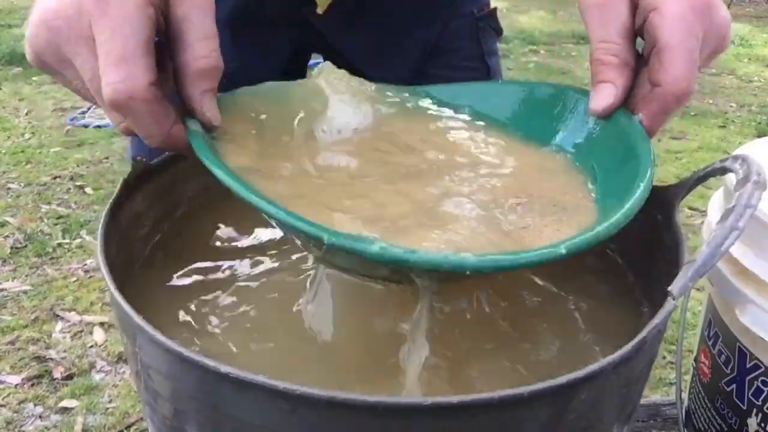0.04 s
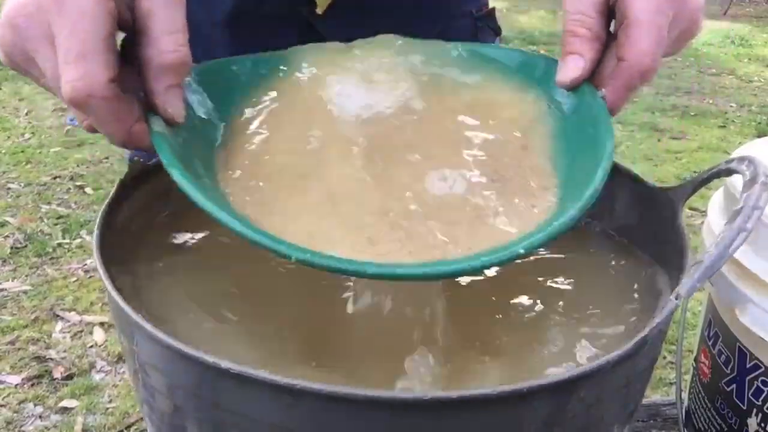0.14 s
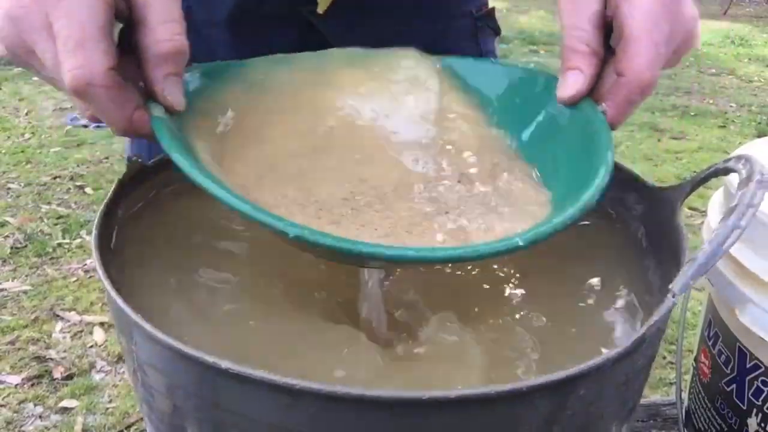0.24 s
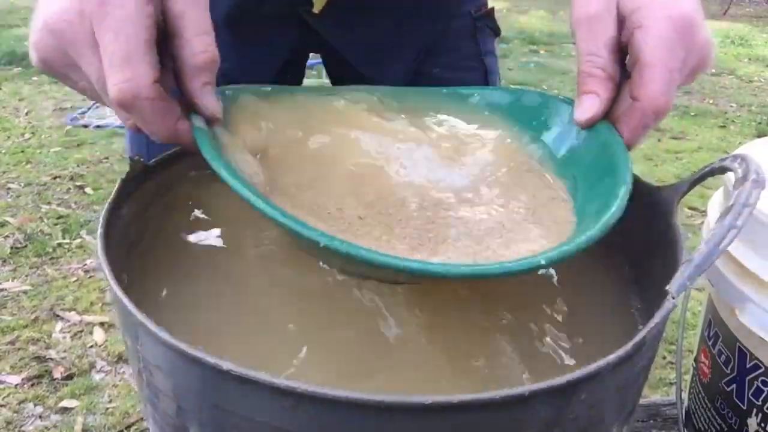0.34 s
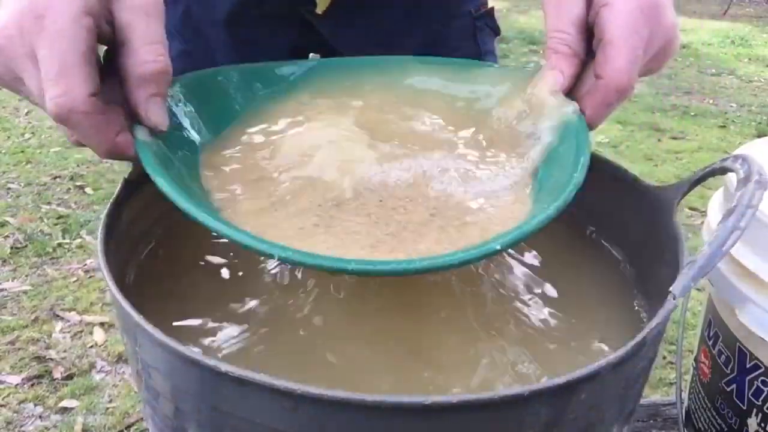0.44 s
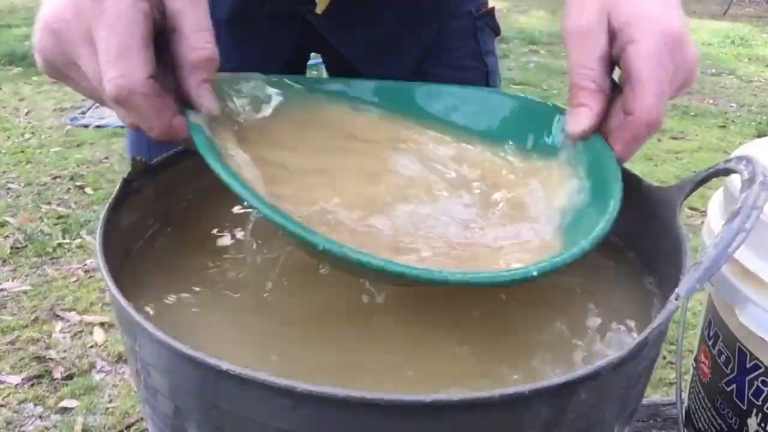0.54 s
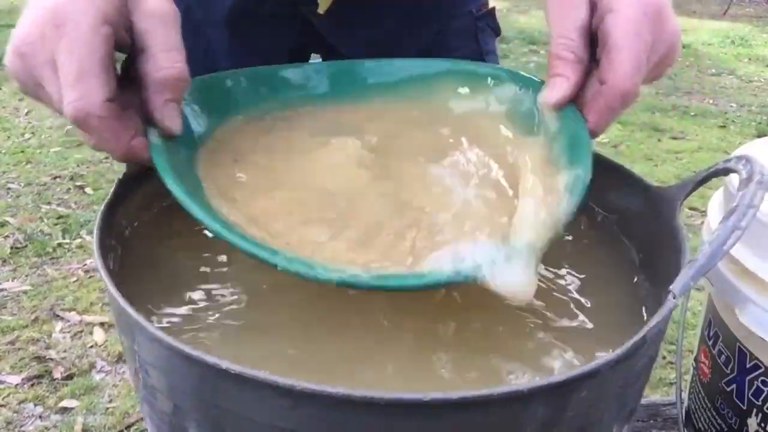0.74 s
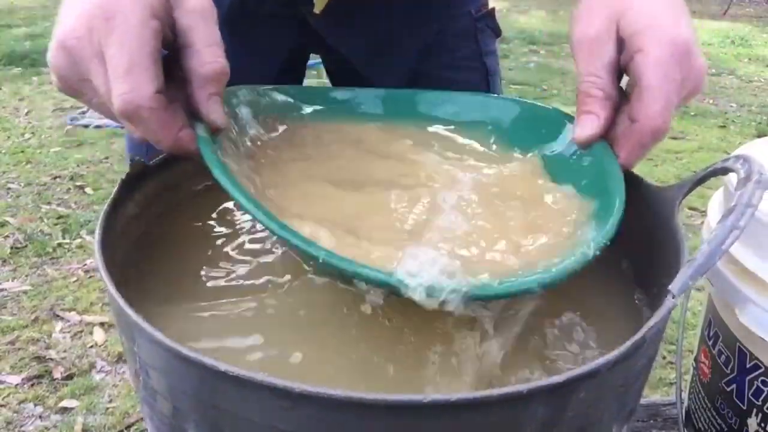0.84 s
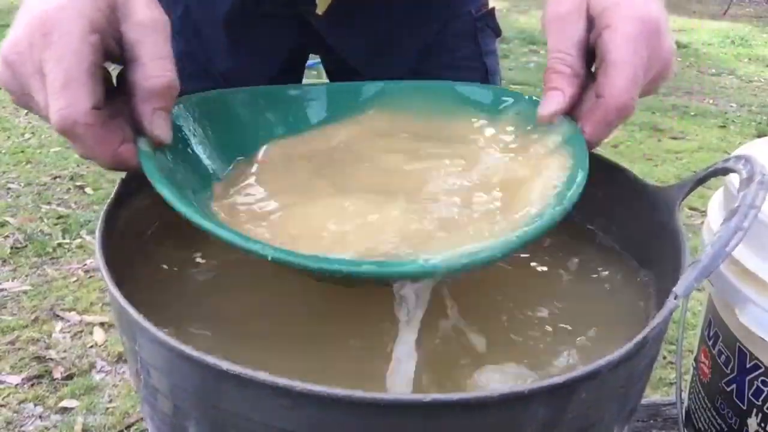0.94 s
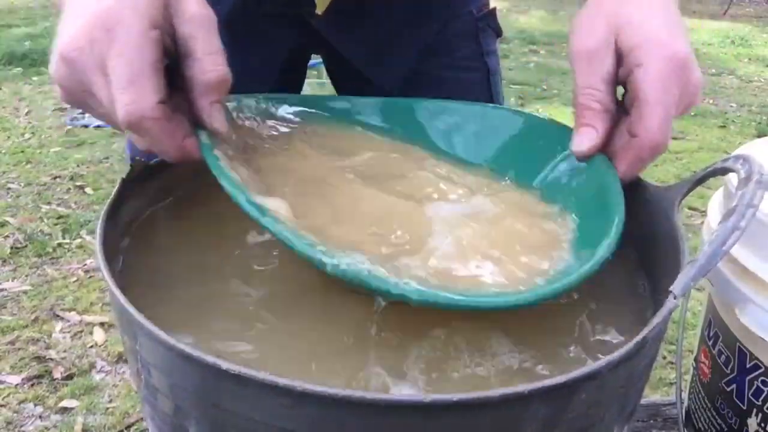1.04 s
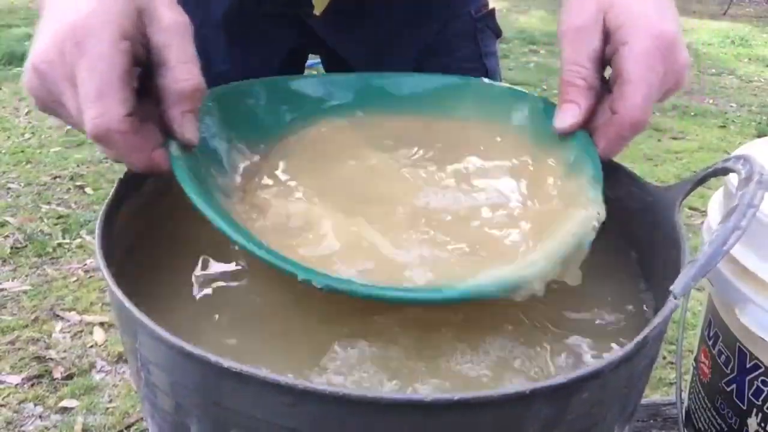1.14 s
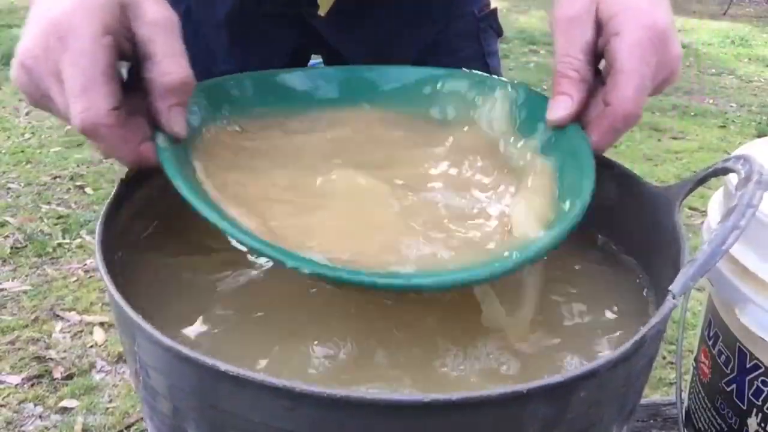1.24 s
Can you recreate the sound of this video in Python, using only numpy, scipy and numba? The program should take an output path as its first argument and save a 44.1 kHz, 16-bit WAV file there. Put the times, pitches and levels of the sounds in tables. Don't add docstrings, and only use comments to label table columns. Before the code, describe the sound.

Water spills off a swirled plastic pan into a full tub, plopping and splashing outdoors

```python
import sys
import numpy as np
from scipy import signal
from scipy.fft import rfft, irfft
from scipy.io import wavfile
from scipy.ndimage import uniform_filter1d
from numba import njit

SR = 44100
rng = np.random.default_rng(int(sys.argv[2]) if len(sys.argv) > 2 else 0)


def rack_gain(trim_db):
    fader = np.asarray(trim_db, float)
    return 10 ** (fader / 20)


def put_to_file(sound):
    columns = np.atleast_2d(sound).T
    safe = np.clip(columns, -1, 1)
    whole_steps = np.round(safe * 32767)
    wavfile.write(sys.argv[1], SR, whole_steps.astype(np.int16))


N = 57330

PLOP_GLIDE, PLINK_GLIDE, SWARM_GLIDE = 0.0003, 0.0015, 0.004
PLOP_WOBBLE, PLINK_WOBBLE = 0.12, 0.32
DROP_RISE_S, TINY_RISE_S, BURST_RISE_S = 0.0011, 0.0008, 0.0007


@njit
def ring(n, start, hz, fall, rise, glide, size):
    out = np.zeros(n)
    for k in range(len(start)):
        phase = 0.0
        step = 2 * np.pi * hz[k] / SR
        for i in range(max(start[k], 0), n):
            age = i - start[k]
            decay = np.exp(-age / fall[k])
            swell = 1 - np.exp(-(age / rise) ** 2)
            out[i] += size[k] * decay * swell * np.sin(phase)
            phase += step
            step = min(step * glide[k], 2.6)
            if decay < 2e-3:
                break
    return out


@njit
def svf(x, hz, width_hz):
    y, b, l = np.empty(len(x)), 0.0, 0.0
    g, k = np.tan(np.pi * hz / SR), width_hz / hz
    for i in range(len(x)):
        v = (b + g * (x[i] - l)) / (1 + g * (g + k))
        b, l, y[i] = 2 * v - b, l + 2 * g * v, k * v
    return y


def unit(x):
    return x / np.sqrt(np.mean(x ** 2))


def unit_band(x, hz, width_hz):
    return unit(svf(svf(x, float(hz), float(width_hz)), float(hz), float(width_hz)))


def bubbles(s, db, hz, cycles, rise_s, glide):
    fall = np.clip(cycles, 2, 26) / hz * SR / np.log(10) + rise_s * SR
    start = ((s - rise_s / 2) * SR).astype(np.int64)
    return ring(N, start, hz, fall, rise_s * SR, (1 + glide) ** (hz / SR), rack_gain(db))


def wobble(depth):
    lowpass = signal.butter(4, 300, fs=SR, output="sos")
    return 1 + depth * unit(signal.sosfilt(lowpass, rng.standard_normal(N)))


# [t/s, level/dB peak, f/Hz, cycles to -20 dB]
PLOPS = [(0.026, -31, 1824, 12.5), (0.097, -35.5, 1450, 17), (0.166, -27, 1293, 10),
         (0.1955, -35, 1714, 23.5), (0.21, -38, 1168, 13), (0.233, -27.5, 1275, 6.5),
         (0.264, -37, 1630, 19), (0.2729, -23.5, 1408, 7.5), (0.312, -44.5, 607, 14),
         (0.349, -30.5, 2036, 22), (0.369, -24, 2003, 23), (0.396, -42.5, 1250, 17),
         (0.4063, -31, 1190, 19), (0.4401, -13.5, 1270, 5), (0.11, -39.5, 1680, 16),
         (.119, -38.5, 2230, 12), (0.45, -30.5, 1550, 32), (0.4709, -20, 1430, -4), (0.48, -23, 1545, 5),
         (0.838, -27, 1570, 4.5), (0.852, -27, 1570, 0), (0.871, -30.5, 1405, 5), (0.8915, -26, 930, 1.5),
         (0.9252, -27.5, 1700, 3.5), (0.904, -36.5, 1170, 4), (0.937, -44.5, 923, 17),
         (1.102, -23, 1416, -2), (1.096, -36, 1580, 4)]
# [t/s, level/dB peak, f/Hz, cycles to -20 dB]
TWINS = [
    (0.0243, -26, 1286, 5),
    (.349, -33.5, 1373, 23),
    (.372, -23.5, 1397, 10),
    (.580, -35, 2094, 10),
    (1.102, -32.5, 990, 4.5),
    (.1885, -32.5, 2550, 9),
    (1.2717, -42, 2950, 8),
]


def plops():
    table = np.vstack([PLOPS, TWINS]).T
    return bubbles(*table, DROP_RISE_S, PLOP_GLIDE) * wobble(PLOP_WOBBLE)


# [t/s, level/dB peak, f/Hz, cycles to -20 dB]
PLINKS = [(0.0267, -37, 3890, 28), (0.0593, -23.5, 3350, 12), (.4578, -15, 2400, 11), (0.31, -36, 5780, 14),
          (0.1352, -31, 3500, 17), (0.138, -32, 4100, 17), (0.1522, -26.5, 3720, 23),
          (0.1658, -25.5, 2930, 6.5), (0.239, -39.5, 3770, 29), (0.2745, -29, 3350, 13),
          (0.2968, -27, 3850, 13), (0.3477, -23.5, 4415, 26), (0.3675, -21, 2830, 15),
          (0.401, -33, 2830, 25), (0.414, -30.5, 4020, 18), (0.4386, -21, 2540, 7),
          (0.4468, -21.5, 4440, -4), (0.4467, -30.5, 5100, 21)]
LATE_PLINKS = [(0.5098, -30.5, 5650, 9.1), (0.5144, -39, 4130, 11), (0.5809, -32.5, 3120, 13),
               (0.6278, -36.5, 4540, 11), (0.837, -27, 2260, 9.5), (0.8525, -31, 3320, 8),
               (.8535, -32, 4100, 8.9), (.8375, -32.5, 4260, 6), (.841, -33, 5430, 15),
               (.9195, -34.5, 6200, 6.3), (.87, -36, 6030, 16), (.904, -34, 5230, 10),
               (.979, -40.5, 4700, 8.8), (.967, -38, 3400, 7.4), (0.8791, -31.5, 2090, 12),
               (0.9, -30.5, 2500, 13), (0.9116, -34, 4060, 7.6), (0.975, -41.5, 3280, 12),
               (1.047, -34, 5280, 17), (1.048, -41, 6040, 10), (1.115, -38.5, 2720, 10),
               (1.29, -46, 2360, 14)]


def plinks():
    table = np.vstack([PLINKS, LATE_PLINKS]).T
    return bubbles(*table, DROP_RISE_S, PLINK_GLIDE) * wobble(PLINK_WOBBLE)


# [t/s, level/dB peak, f/Hz, cycles to -20 dB]
SWELLS = [
    (0.4600, -3, 2740, 2),
    (0.483, -19, 1216, 24),
    (0.078, -27, 3640, 8),
    (0.1226, -25, 4650, 14),
    (0.4250, -24, 1070, 4),
    (1.1105, -35, 3610, 22),
    (0.622, -38, 3850, 6),
    (0.5065, -34, 4450, 8),
]


def swells():
    return bubbles(*np.array(SWELLS, float).T, 0.0021, PLOP_GLIDE) * wobble(PLOP_WOBBLE)


def froth(count):
    parents = np.vstack([PLOPS, TWINS, PLINKS, LATE_PLINKS]).T
    s, db, hz = parents[:3]
    delay, detune, drop = rng.random((len(s), count, 3)).T
    onset = s + 0.0094 * delay ** 2
    pitch = np.clip(hz * np.exp(0.295 * 2 * (2 * detune - 1)), 700, 9000)
    level = np.minimum(db - 9, -29) - 16.4 * drop
    return bubbles(onset.ravel(), level.ravel(), pitch.ravel(), 3, TINY_RISE_S, SWARM_GLIDE)


# [t/s, level/dB peak, f/Hz, cycles to -20 dB]
SLOSH = [
    (.416, -36, 729, 14),
    (.424, -38.5, 828, 6),
    (0.525, -38.5, 512, 5.5),
    (0.527, -38, 224, -1.5),
    (0.534, -47.5, 344, 11.5),
    (0.546, -44, 191.5, 8),
    (.554, -47.5, 210.5, 8.5),
    (.93, -52, 452, 5),
]


def slosh():
    return bubbles(*np.array(SLOSH, float).T, 0.00049, 0.0) * wobble(PLOP_WOBBLE)


def puff(n, ring_s):
    t = np.arange(n) / SR
    return (1 - np.exp(-(t / BURST_RISE_S) ** 2)) * np.exp(-2 * t / ring_s)


# [t/s, level/dB peak, f/Hz centre]
SPLATS = [(0.118, -42.5, 9550), (0.134, -34.5, 8900), (0.156, -43, 15000), (0.2396, -36, 7950),
          (0.2588, -38, 7400), (0.2779, -18, 6100), (0.2783, -29, 9400), (0.323, -39.5, 6700),
          (0.3467, -27.5, 10700), (0.3536, -26, 7600), (0.3696, -15.5, 8700), (0.3716, -18, 8800),
          (0.375, -28.5, 7000), (0.387, -31, 9400), (0.402, -31.5, 8200), (0.4471, -25, 6860),
          (0.47, -27, 8100), (0.4784, -33, 8700), (0.5074, -31.5, 8620), (0.525, -34, 12500),
          (0.53, -35.5, 8500), (0.5514, -35, 12500), (0.5824, -37, 12700), (0.8355, -33.5, 10920),
          (0.856, -22.5, 11650), (0.9657, -48.5, 9600), (1.0914, -39, 14900), (1.121, -45.5, 9700),
          (1.1762, -50, 14000), (1.1864, -41.5, 13900), (1.195, -46, 14300), (1.282, -45, 13000),
          (1.2213, -46, 12400), (.922, -42, 12400), (1.2725, -48, 9600)]


def splats():
    length = 1024
    out, envelope = np.zeros(N + length), puff(length, ring_s=0.0028)
    for s, db, hz in SPLATS:
        noise = rng.standard_normal(length)
        bright = unit_band(noise, hz, 0.67 * hz)
        body = unit_band(noise, 0.5 * hz, 0.52 * hz)
        body_db = -5 if hz > 6000 else 5
        i = int((s - BURST_RISE_S / 2) * SR)
        out[i:i + length] += rack_gain(db) * envelope * (bright + rack_gain(body_db) * body)
    return out[:N]


# [t/s, level/dB peak, f/Hz centre, ring/s]
SLAPS = [(0.0242, -41, 2470, 0.0092), (0.0593, -38, 3080, 0.016), (0.138, -38, 3770, 0.014),
         (.151, -38.5, 4260, 0.011), (0.159, -42, 4730, 0.0096), (0.1971, -37.5, 2960, .006),
         (0.2308, -38.5, 3500, 0.0061), (0.273, -30, 2470, 0.0055), (.415, -37, 2220, 0.01),
         (0.427, -31, 2030, 0.012), (.455, -26, 2300, 0.0073), (0.4717, -35, 2000, 0.0043),
         (.478, -33.5, 2800, 0.0079), (.515, -37.5, 3500, 0.0039), (0.5251, -27.5, 4500, 0.0023),
         (0.531, -34, 3020, 0.0037), (.540, -35, 3500, 0.0037), (0.553, -39.5, 2830, .007),
         (0.565, -41, 3800, 0.0055), (.580, -39, 3150, 0.013), (0.6269, -46, 4450, 0.005),
         (0.836, -34.5, 3600, 0.0072), (0.848, -43, 3600, 0.0093), (0.8514, -27, 3620, 0.0056),
         (0.87, -37, 3040, 0.0071), (.879, -39, 2940, 0.013), (0.89, -39.5, 3000, 0.014),
         (0.901, -44, 3200, 0.012), (0.9239, -36, 3070, 0.0081), (0.9747, -48.5, 3750, 0.009),
         (1.048, -46.5, 5100, 0.0045), (1.1016, -36.5, 2600, 0.0094), (1.114, -41, 2670, 0.0054),
         (1.273, -47, 2200, 0.0042)]


def slaps():
    length = 2048
    out = np.zeros(N + length)
    for s, db, hz, ring_s in SLAPS:
        burst = unit_band(rng.standard_normal(length), hz, 0.95 * hz)
        i = int((s - BURST_RISE_S / 2) * SR)
        out[i:i + length] += rack_gain(db) * puff(length, ring_s) * burst
    return out[:N]


# [f/Hz, level/dB]
SWARM = [(600, -12), (1200, 8), (2500, 6), (4500, 2), (7000, -4)]


def fizz(count):
    sizes = np.array(SWARM, float).T
    when, pitch, loudness, length = rng.random((count, 4)).T
    hz = sizes[0, 0] * (sizes[0, -1] / sizes[0, 0]) ** pitch
    db = np.interp(np.log(hz), np.log(sizes[0]), sizes[1]) + 10 * loudness ** 2
    cycles, glide = 11 * (0.17 + length), SWARM_GLIDE * (length - 0.2)
    tiny = unit(bubbles(when * N / SR, db, hz, cycles, TINY_RISE_S, glide))
    wash = unit_band(rng.standard_normal(N), 2100, 4440)
    return tiny + rack_gain(-8) * wash


def spray():
    centre_hz, width_hz, tick_cycles, ticks_per_s = 8800, 19000, 11, 200
    ticks = (rng.random(N) < ticks_per_s / SR) * rack_gain(3 * rng.random(N) ** 2)
    window = np.hanning(int(tick_cycles / centre_hz * SR) + 4)
    envelope = np.sqrt(np.convolve(ticks ** 2, window, "same"))
    noise = rng.standard_normal(N) * (unit(envelope) + rack_gain(-1))
    return unit_band(noise, centre_hz, width_hz)


# [t/s, level/dB, spray share/dB]
FLOW = [(0, -57.5, -7), (.28, -48.5, -15.5), (0.339, -57.5, 0.5), (0.359, -52, 5), (0.446, -42, -10),
        (0.587, -58.5, -0.5), (0.613, -65.5, -10.5), (0.679, -56, -15), (0.766, -67, -10.5),
        (0.842, -48.5, -6.5), (0.899, -49.5, -10.5), (0.977, -53, -14), (0.998, -69, -9),
        (1.092, -47, -14.5), (1.133, -60, -14.5), (1.176, -49.5, -18.5), (1.259, -66.5, -9),
        (1.279, -52.5, -12)]


def swarm(count):
    flow_s, flow_db, spray_db = np.array(FLOW, float).T
    t = np.arange(N) / SR
    level = rack_gain(-0.5 + np.interp(t, flow_s, flow_db))
    return level * (fizz(count) + spray() * rack_gain(np.interp(t, flow_s, spray_db)))


def tub(x):
    tail_db, t60_s = -17, 0.04
    t = np.arange(3000) / SR
    ir = rack_gain(tail_db) * rng.standard_normal(3000) * rack_gain(-60 * t / t60_s) * np.sqrt(14 / t60_s / SR)
    ir[0] = 1
    return signal.fftconvolve(x, ir)[:N]


# [f/Hz, level/dB]
GARDEN = [(24, -35), (40, 8), (372, -2.5), (646, -1), (852, 1.5), (1180, -7), (16000, -52.5)]


def garden():
    air_hz, air_db = np.array(GARDEN, float).T
    f = np.maximum(np.arange(N // 2 + 1) * SR / N, 1)
    shape = rack_gain(np.interp(np.log(f), np.log(air_hz), air_db))
    air = unit(irfft(rfft(rng.standard_normal(N)) * shape, N))
    k = int(SR / 14)
    walk = uniform_filter1d(np.repeat(rng.standard_normal(N // k + 1), k), k)[:N]
    rumble = unit_band(rng.standard_normal(N), 88, 82)
    drone = unit(svf(rng.standard_normal(N), 875.0, 30.0))
    return rack_gain(-75) * drone + rack_gain(-66) * air + rack_gain(-66 + 1.9 * walk) * rumble


def scene():
    drops = plops() + plinks() + swells() + froth(count=6) + slosh()
    water = drops + splats() + slaps() + swarm(count=3600)
    return (tub(water) + garden())[None]


def low_pass(x):
    return signal.sosfilt(signal.butter(12, 16480, fs=SR, output="sos"), x)


def record(dry):
    top_hz, bass_hz = 16400, 48
    x = signal.sosfilt(signal.ellip(8, 0.2, 70, top_hz, fs=SR, output="sos"), dry)
    x = signal.sosfilt(signal.butter(3, bass_hz, "high", fs=SR, output="sos"), x)
    return low_pass(x)


dry = scene()
out = record(dry)
put_to_file(out)
```